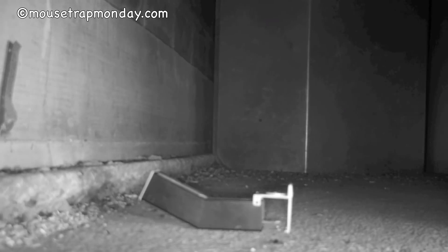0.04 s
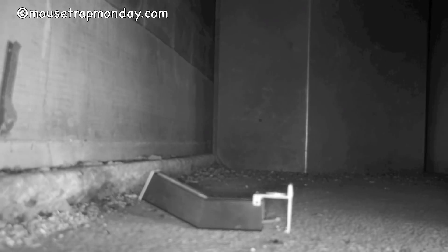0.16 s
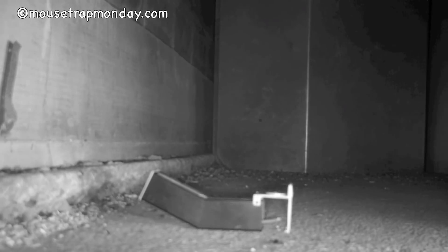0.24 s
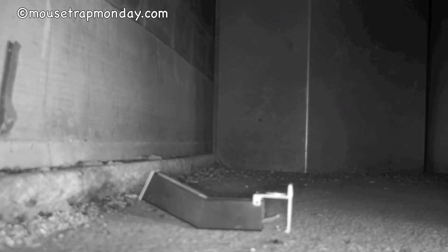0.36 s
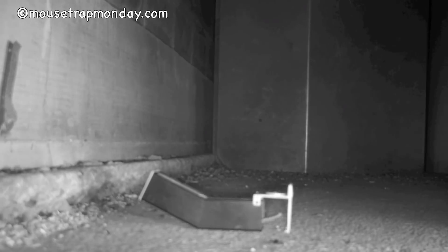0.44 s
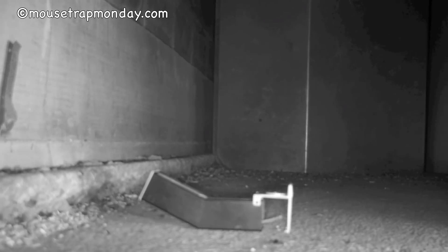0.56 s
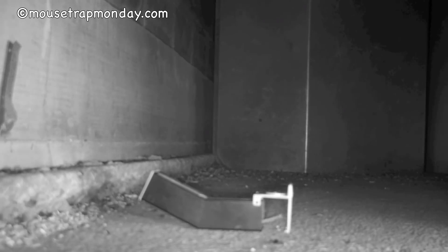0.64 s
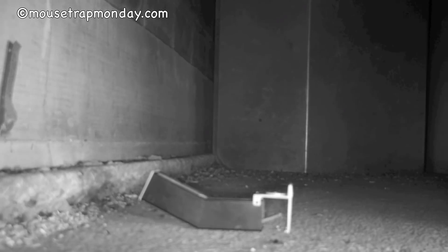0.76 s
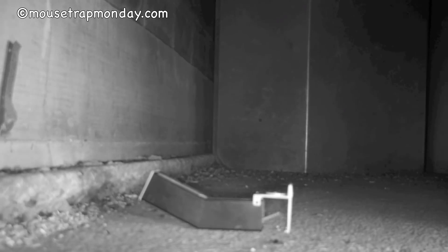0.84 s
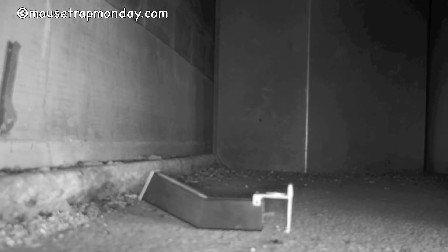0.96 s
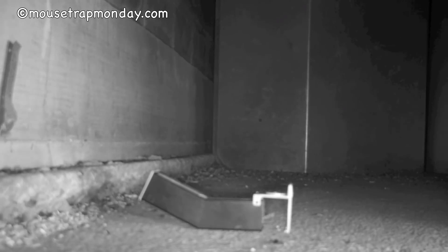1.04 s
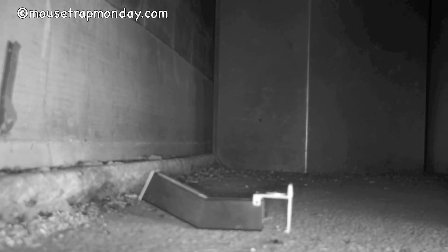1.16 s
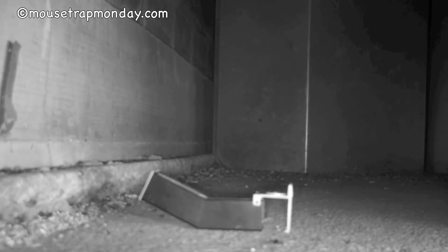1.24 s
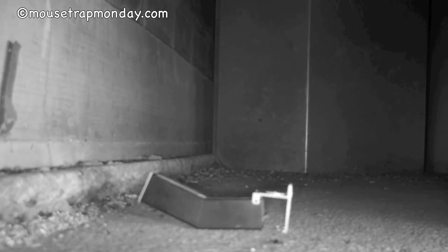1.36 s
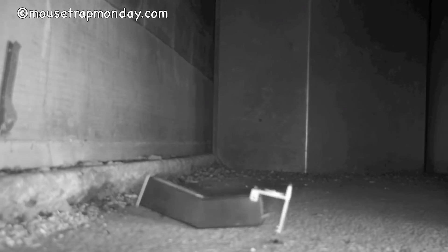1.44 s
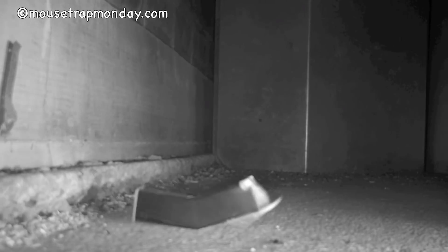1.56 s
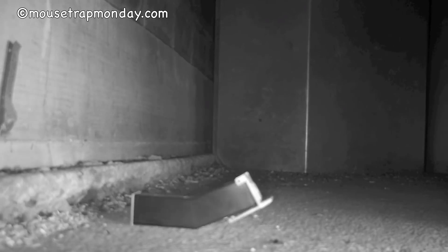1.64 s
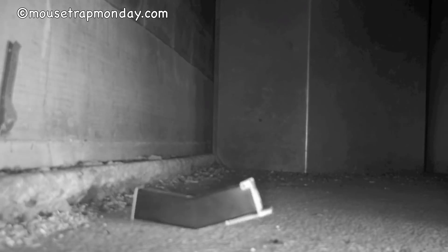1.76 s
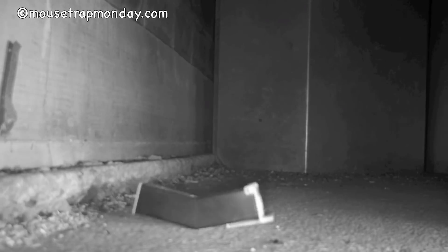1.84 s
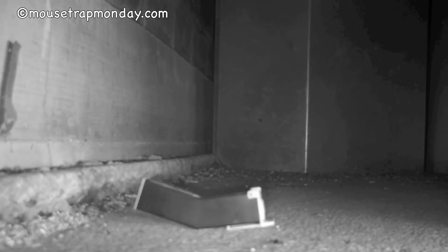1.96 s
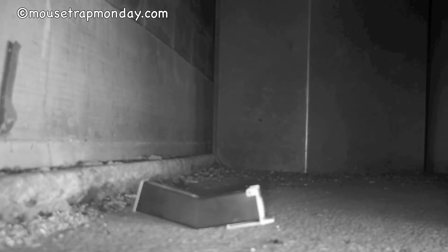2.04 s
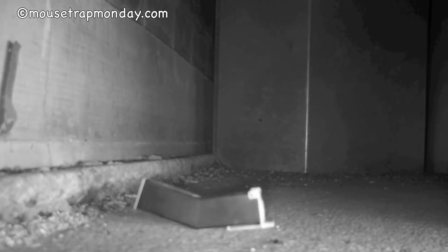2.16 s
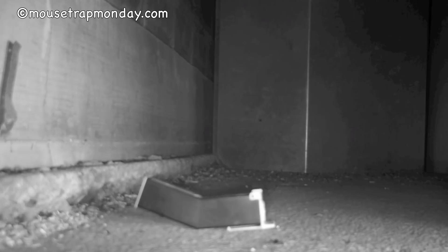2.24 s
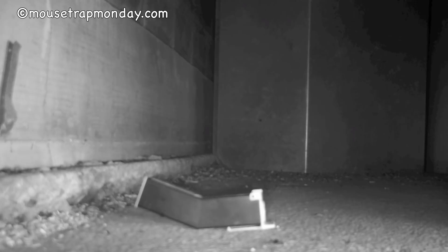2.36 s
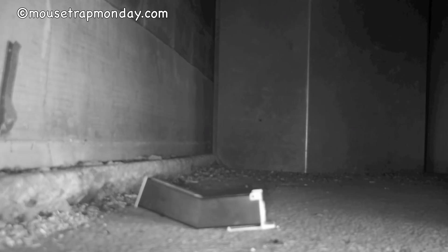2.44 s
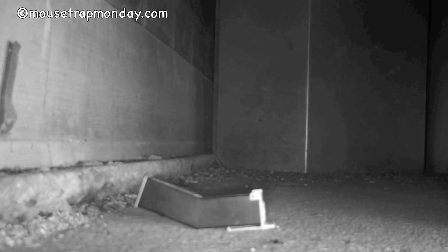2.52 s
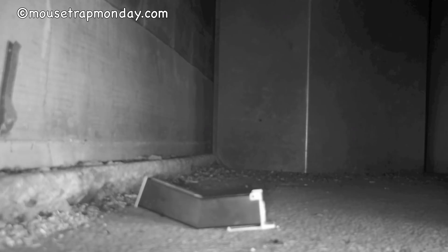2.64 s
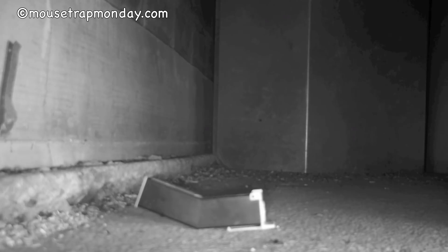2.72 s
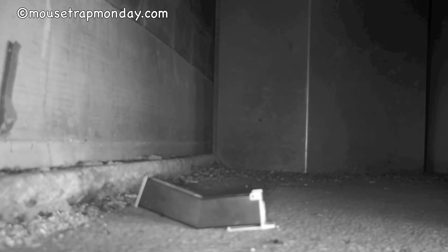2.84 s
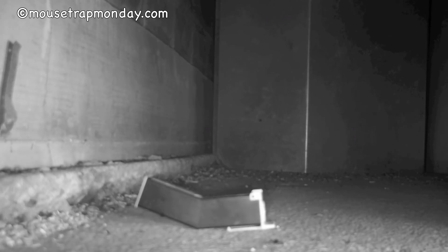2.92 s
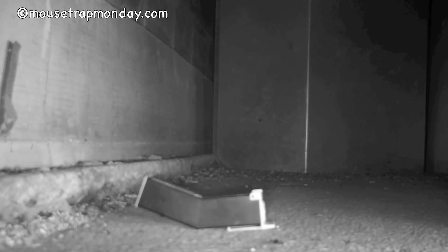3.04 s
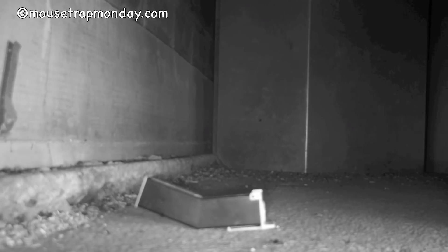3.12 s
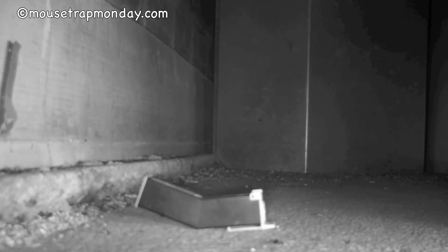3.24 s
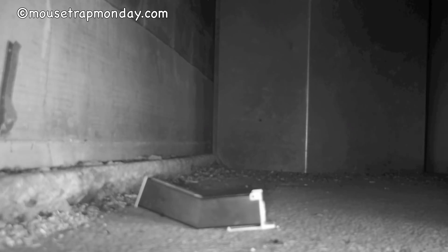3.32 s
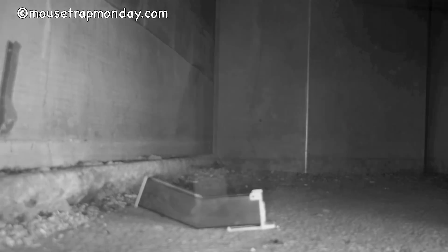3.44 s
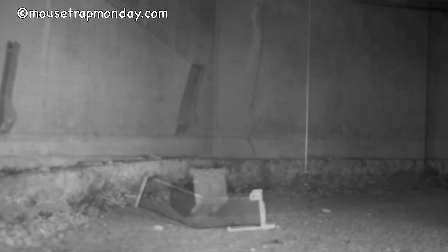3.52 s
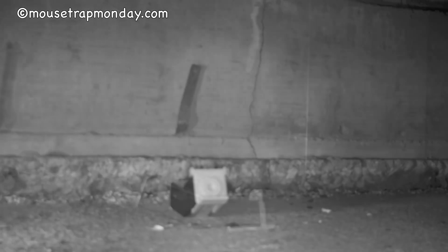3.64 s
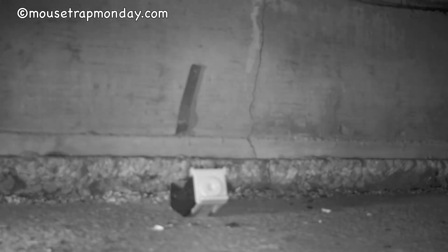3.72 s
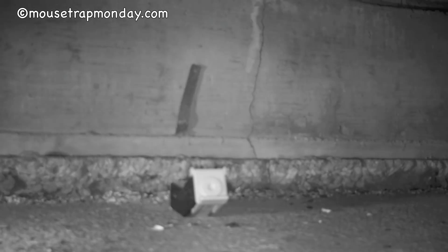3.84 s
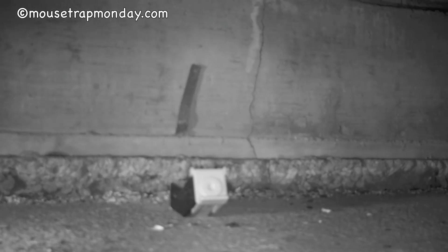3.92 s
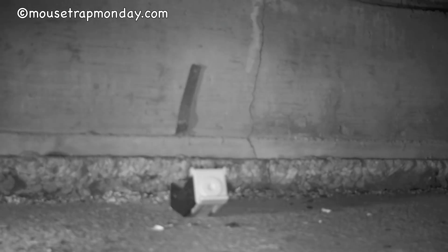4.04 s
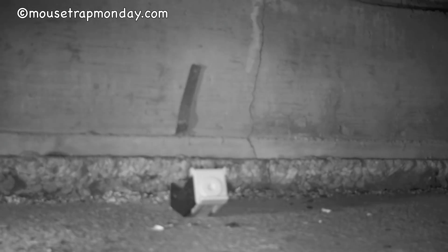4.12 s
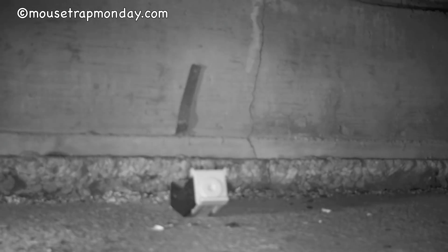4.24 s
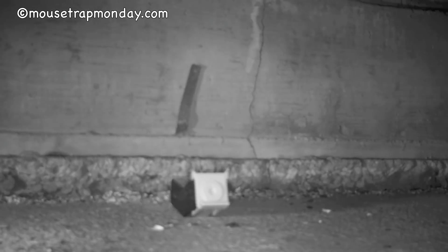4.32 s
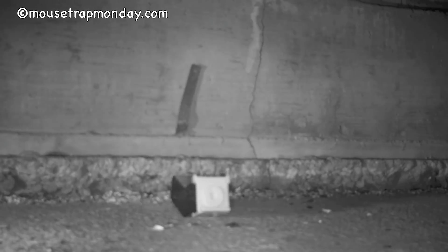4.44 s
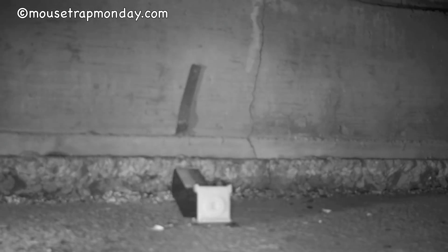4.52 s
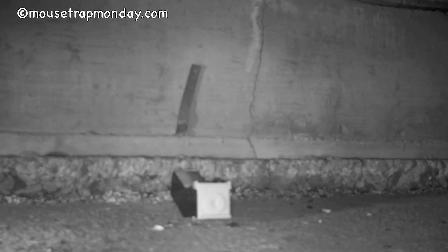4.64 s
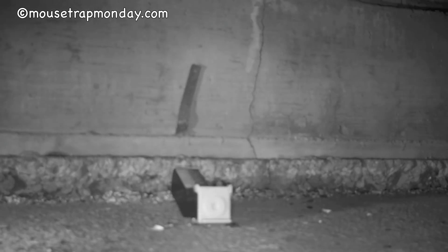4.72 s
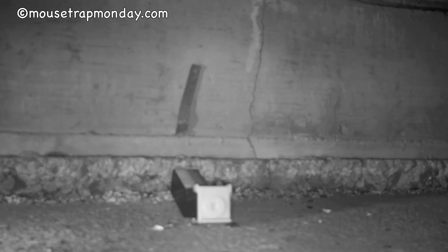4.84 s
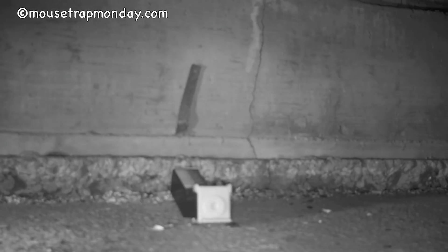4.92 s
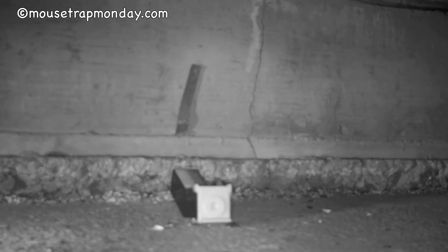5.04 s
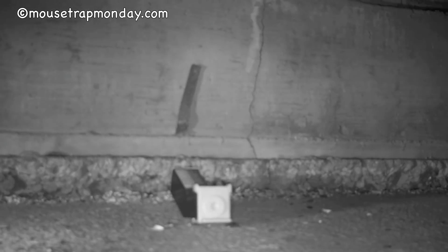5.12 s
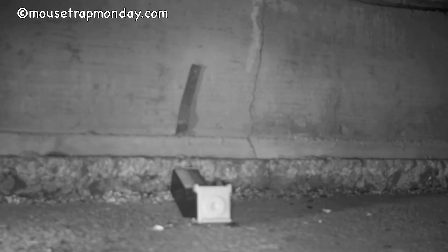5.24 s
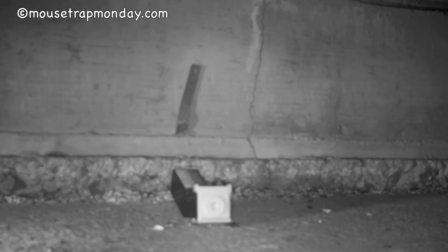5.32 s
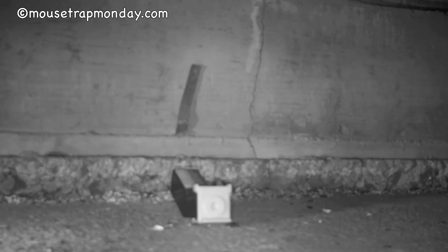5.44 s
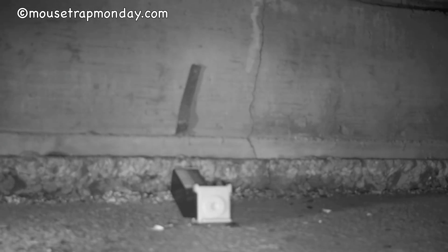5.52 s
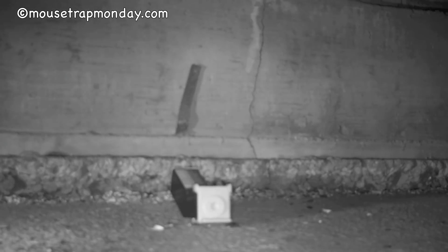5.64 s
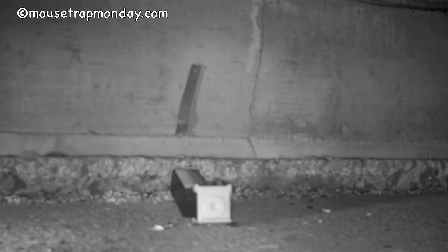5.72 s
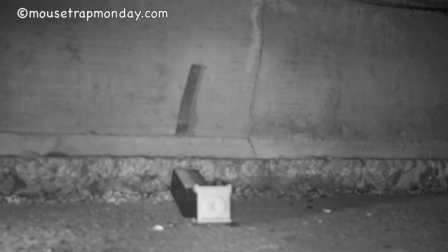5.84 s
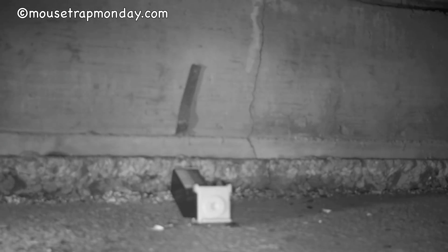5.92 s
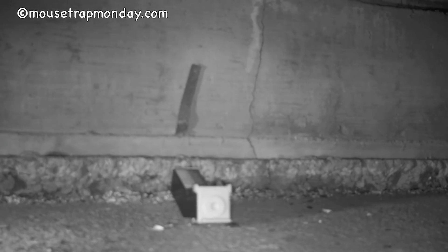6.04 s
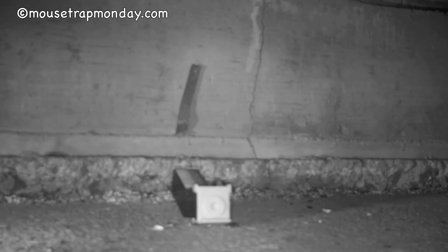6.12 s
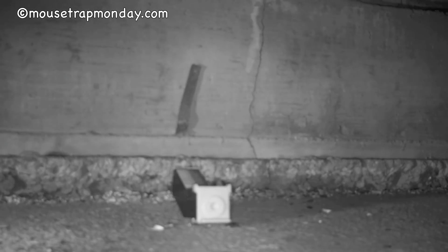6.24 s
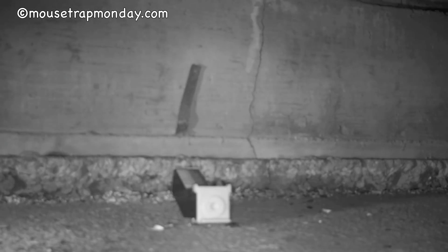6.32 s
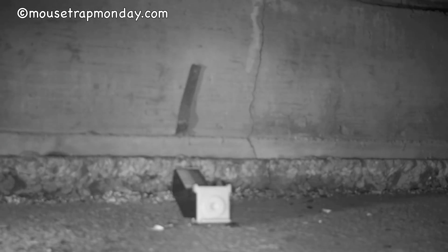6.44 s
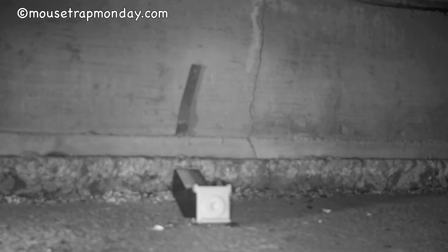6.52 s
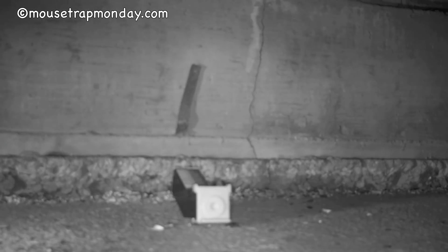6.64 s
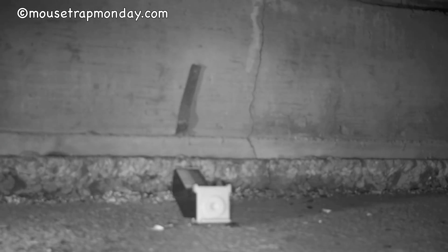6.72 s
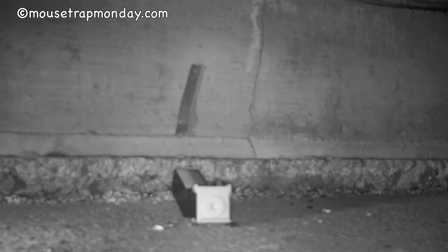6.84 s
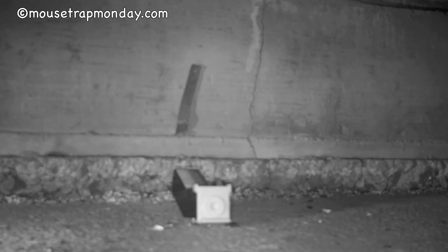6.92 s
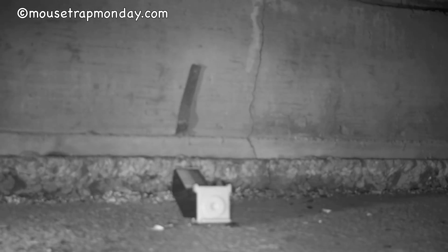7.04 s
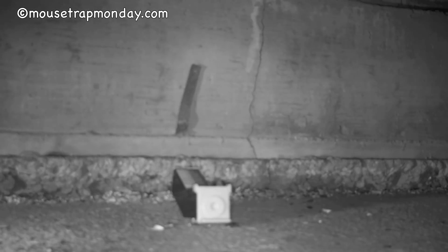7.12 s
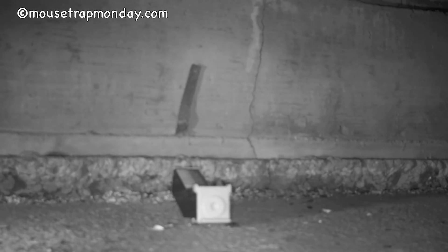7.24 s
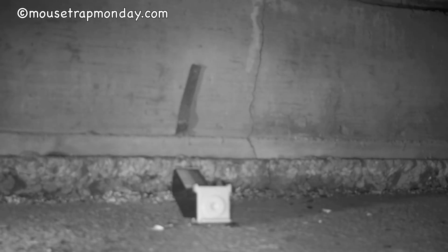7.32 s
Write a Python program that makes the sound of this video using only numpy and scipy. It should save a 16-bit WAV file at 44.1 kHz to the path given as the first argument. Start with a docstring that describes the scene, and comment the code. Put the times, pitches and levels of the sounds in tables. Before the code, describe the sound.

Over low hiss, a plastic mouse trap's door scrapes and snaps shut, followed by light knocks on concrete and faint scratches from inside.

```python
"""A quiet barn at night, one camera microphone close to a plastic see-saw trap on the concrete floor.
A mouse scratches its way in; from 1.4 s the trap tips and its door scrapes down, then snaps shut at
1.66 s, overloading the input. Until 2.3 s the body rocks back with tiny squeaks of the pivot. At 4.4 s
the trap drops back once more, and from 5.4 s claws tick inside it. The barn rings briefly after each
blow; night air, mains hum and the camera's hiss and thin whine lie under it all."""
import sys
import numpy as np
from scipy import signal
from scipy.fft import rfft, irfft, next_fast_len
from scipy.io import wavfile
from scipy.ndimage import uniform_filter1d

SR = 44100
rng = np.random.default_rng(int(sys.argv[2]) if len(sys.argv) > 2 else 0)


def log_audio(samples):
    """Write samples as a 16-bit WAV file to the path given in sys.argv[1]."""
    # one column per channel
    frames = np.atleast_2d(samples).T
    # limit to full scale, then quantise
    limited = np.clip(frames, -1, 1)
    pcm = np.round(limited * 32767).astype(np.int16)
    wavfile.write(sys.argv[1], SR, pcm)


N = 325017

# the door judders, snaps shut and rebounds, close to the microphone: (t/s, level/dB, weight/dB, edge/dB)
DOOR_KNOCKS = [(1.462, -48.5, 7, -6), (1.469, -36.5, -6, -11.5), (1.488, -33, -10, -7),
               (1.501, -29, -4, 4.5), (1.5238, -26.5, -9.5, 3.5), (1.552, -34, -1, -9),
               (1.5835, -29.5, 1.5, -2), (1.589, -34, 7.5, -10.5), (1.662, -12.5, 1, 12.5),
               (1.672, -21, 4, -7), (1.6925, -26.5, 10.5, 5), (1.702, -27, 4, 3), (1.7445, -32, -4, 14.5)]
# modes of the trap's body and door: (f/Hz, level/dB, t60/s)
BODY_MODES = [(158, -8, 0.078), (522, 0.5, 0.08), (623, -13, 0.13), (1055, -6, 0.047), (1165, -11.5, 0.072),
              (1377, -2.5, 0.09), (1840, -16.5, .1), (1918, -14, .09), (2171, 3, 0.053), (2507, 2.5, 0.07),
              (2680, -10, 0.072), (2794, -7.5, 0.07), (3017, -19, 0.0895), (3800, -11.5, 0.065),
              (4120, -14, 0.1005), (5030, -9, .05), (5470, -11.5, .05), (5660, -4, 0.03),
              (6460, -13, 0.036), (7100, -24, 0.08), (9040, -25.5, 0.054)]
def door(scuff_s=0.00018):
    """The swinging door strikes the open body."""
    return blows([(*row, scuff_s) for row in DOOR_KNOCKS], BODY_MODES,
                 thump_db=-23.5, knock_db=-10.5, ring_db=-7, crack_db=-20, modes_db=2.5,
                 dense_db=-11.5, dense_t60=0.064, contact_s=0.0052, grit_db=4.5, room_db=-10.5)


# the tube rocks and lands on the concrete: (t/s, level/dB, weight/dB, edge/dB, scuff/s)
TUBE_LANDINGS = [(1.971, -47, -1, -6, 0.00045), (1.978, -41.5, -2, -14, 0.0016),
                 (2.0095, -36, -2, 1.5, 0.00033), (2.264, -43, -7, -31, 0.0029),
                 (2.278, -51.5, 10, -2, 0.0029), (2.3005, -41.5, -1, 7, 0.00058),
                 (4.412, -31.5, -5.5, 3.5, 0.0023), (4.4528, -44.5, 4, 6, .0005),
                 (4.46, -48.5, 3.5, -7, .0018), (4.4785, -43.5, -9, 15.5, 0.0013),
                 (4.636, -42, 1.5, -7, 0.007), (4.683, -50, 7.5, -5, 0.0043)]
# modes of the tube while it presses on the floor: (f/Hz, level/dB, t60/s)
GROUNDED_MODES = [(363.4, -3, 0.14), (444, -9, 0.084), (524, -16, 0.042), (1038, -4, 0.08),
                  (1210, -5, 0.075), (1535, -3, 0.092), (1750, -3.5, 0.1), (2085, 3.5, 0.081),
                  (2580, -18, 0.026), (2740, 0, 0.06), (3590, 6.5, 0.026), (4330, 10, 0.011),
                  (5640, -10, .025)]
def tube():
    """The tube see-saws under the mouse and meets the floor."""
    return blows(TUBE_LANDINGS, GROUNDED_MODES,
                 thump_db=-9.5, knock_db=-1.5, ring_db=-7, crack_db=-17, modes_db=-1.5,
                 dense_db=-11, dense_t60=0.14, contact_s=0.0033, grit_db=1.0, room_db=-10.5)


# claws and teeth on the inner wall, heard from outside: (t/s, level/dB, weight/dB, edge/dB)
CLAW_TAPS = [(5.364, -55, 2, -3), (5.406, -38.5, -6, -1), (5.455, -51, 0, 6), (5.4843, -35.5, -9, -11),
             (5.564, -52, 0, 4), (6.041, -52, 2, 0), (6.164, -52.5, 5, 6), (6.17, -46.5, -3, 1),
             (6.9386, -44.5, -10, -13), (6.953, -56, 3, 13), (6.9978, -36, 2, 3), (7.3341, -49, 14, 11.5),
             (7.3454, -41, 7, -11)]
# modes of the closed tube's wall: (f/Hz, level/dB, t60/s)
WALL_MODES = [(1710, 0.5, 0.038), (2007, -7.5, 0.15), (2574, 4, 0.04), (2790, 10.5, 0.013),
              (3400, -3.5, 0.022), (3950, -11, 0.056), (5900, -24, .03), (6340, -5, 0.06)]
def claws(scuff_s=0.0016):
    """The mouse taps the wall of the closed tube."""
    return blows([(*row, scuff_s) for row in CLAW_TAPS], WALL_MODES,
                 thump_db=-29.5, knock_db=-13, ring_db=-11, crack_db=-18, modes_db=10.0,
                 dense_db=-9.5, dense_t60=0.17, contact_s=0.0044, grit_db=-1.5, room_db=-10.1)


# the door's pivot at its loudest moments: (t/s, f/Hz, level/dB, half length/s)
PIVOT_SQUEAKS = [(1.747, 5940, -30, 0.0031), (1.983, 6060, -35.5, 0.0037), (2.2765, 6040, -40.5, 0.0034),
                 (2.302, 6000, -28.5, 0.00089)]
def squeaks():
    """The pivot sticks and slips, singing for a few milliseconds as the trap rocks."""
    track = np.zeros(N)
    t = np.arange(-SR // 20, SR // 20) / SR
    for s, hz, db, half_s in PIVOT_SQUEAKS:
        phase = 2 * np.pi * hz * t + 0.06 * np.cumsum(rng.standard_normal(len(t)))
        add(track, s + t[0], amp(db) * np.exp(-(t / half_s) ** 2) * np.sin(phase))
    return track


# the door's legs creep, skid and fold over the floor: (t/s, level/dB, half length/s)
LEG_SKIDS = [(1.415, -59, 0.062), (1.512, -41.5, 0.038), (1.635, -46.5, 0.048)]
# spectrum of plastic on grit: (f/Hz, level/dB)
RASP_COLOUR = [(100, -30.5), (400, -21.5), (530, -3), (850, -20.5), (1380, 5), (1620, -20.5), (2050, 7.5),
               (2800, -1.5), (3200, -11), (4200, -29), (5500, -8), (7500, -29), (15000, -40)]
def drag(slips_per_s=1200, ring_db=0.5):
    """Grit catches the door's legs in tiny slips that ring the body."""
    t = np.arange(SR // 5) / SR
    slips = rng.standard_normal(N) * (rng.random(N) < slips_per_s / SR)
    ring = unit(signal.fftconvolve(slips, ringing(BODY_MODES, t))[:N])
    rasp = unit(coloured(slips, RASP_COLOUR))
    return strokes(LEG_SKIDS) * unit(amp(ring_db) * ring + rasp)


# soft claw strokes along the wall, faint even this close: (t/s, level/dB, half length/s)
CLAW_STROKES = [(1.067, -61, 0.0037), (2.153, -56, .013), (3.273, -54, 0.0025), (3.896, -65, 0.0043),
                (5.922, -58.5, 0.0077), (6.017, -64, 0.0077), (6.113, -64.5, .007), (6.89, -57, .003),
                (6.903, -51.5, .008), (7.317, -59, 0.011)]
# spectrum of a claw on plastic: (f/Hz, level/dB)
STROKE_COLOUR = [(100, -51), (1500, -22), (2100, -8), (2500, 1), (2800, 1), (3300, -32), (6000, -16),
                 (15000, -40)]
def scratches(slips_per_s=2500):
    """A sliding claw catches in many tiny slips that stir the wall near its main resonance."""
    slips = rng.standard_normal(N) * (rng.random(N) < slips_per_s / SR)
    return strokes(CLAW_STROKES) * unit(coloured(slips, STROKE_COLOUR))


def strokes(table):
    """Each rub swells and fades in a bell curve of pressure, loudest at its listed time."""
    t = np.arange(N) / SR
    return sum(amp(db) * np.exp(-((t - s) / half_s) ** 2) for s, db, half_s in table)


# spectrum of the plastic's many short-lived modes: (f/Hz, level/dB)
DENSE_COLOUR = [(70, -43), (140, -16), (280, -8), (500, 0.5), (850, -12.5), (1200, -5), (1600, -10.5),
                (2000, -3), (2750, -5), (3250, -14), (4300, -9), (6000, -2), (7500, -15), (12000, -20),
                (15500, -29)]
def blows(table, modes, thump_db, knock_db, ring_db, crack_db, modes_db,
          dense_db, dense_t60, contact_s, grit_db, room_db):
    """The surfaces scuff together, crack on contact, and leave clear modes over a wash of dense ones."""
    track = np.zeros(N)
    t = np.arange(-SR // 100, SR // 5) / SR
    for s, db, weight_db, edge_db, scuff_s in table:
        scuff = np.exp(-np.abs(t) / scuff_s)
        fade = np.exp(-np.abs(t) / contact_s) + amp(dense_db - 60 * np.abs(t) / dense_t60)
        grit = amp(grit_db * unit(uniform_filter1d(rng.standard_normal(len(t)), size=40)))
        dense = unit(coloured(rng.standard_normal(len(t)), DENSE_COLOUR))
        hit = dense * grit * np.where(t < 0, scuff, fade) + amp(modes_db) * ringing(modes, t)
        # around the clack at 0 dB, a heavy blow is deeper and one on a hard edge brighter
        balance_db = np.array([thump_db + weight_db, knock_db + weight_db, 0,
                               ring_db + 0.31 * edge_db, crack_db + edge_db])
        add(track, s + t[0], in_barn(balanced(hit, db + balance_db), room_db))
    return track


def ringing(modes, t):
    """The clear modes after a blow at t = 0; the loose parts rattle, which roughens their pitch."""
    hz, db, t60 = np.transpose(modes)[:, :, None]
    after = np.maximum(t, 0)
    sizes = amp(db + rng.uniform(-2, 2, hz.shape)) * rng.choice([-1, 1], hz.shape)
    jolts = rng.standard_normal((len(hz), len(t))) * (t > 0)
    rattle = 0.02 * np.sqrt(hz / 1000) * np.cumsum(jolts, 1)
    partials = sizes * amp(-60 * after / t60) * np.sin(2 * np.pi * hz * after + rattle)
    return np.sum(partials, 0) / np.linalg.norm(sizes)


# a blow's thump, knock, clack, ring and crack: (low f/Hz, high f/Hz)
BLOW_BANDS = [(130, 430), (430, 1600), (1600, 3500), (3500, 8000), (8000, 15000)]
def balanced(hit, bands_db):
    """Colour a blow so that the loudest 4 ms of each band come near its given level."""
    parts = [signal.sosfilt(signal.butter(2, band, "band", fs=SR, output="sos"), hit)
             for band in BLOW_BANDS]
    peak_powers = [uniform_filter1d(part ** 2, size=176).max() for part in parts]
    gains_db = bands_db - 10 * np.log10(peak_powers)
    centres_hz = np.sqrt(np.prod(BLOW_BANDS, 1))
    bass = [(70, gains_db[0] - 18), (150, gains_db[0])]  # the blows fall away steeply below 150 Hz
    return coloured(hit, [*bass, *zip(centres_hz, gains_db)])


# how long the barn rings around the trap: (f/Hz, t60/s)
BARN_DECAY = [(150, 0.56), (500, 0.95), (1500, 0.71), (3000, 0.79), (6000, 0.56), (10000, 0.38),
              (15000, 0.15)]
# spectrum of that ring at the microphone: (f/Hz, level/dB)
BARN_COLOUR = [(80, -53), (200, 4), (500, 1.5), (1000, 0), (1800, -2), (2300, -9), (3200, -2), (6000, -5),
               (10000, 3), (15000, -4.5)]
def in_barn(x, room_db):
    """The direct sound and the barn's answer, different from every spot; the treble dies first."""
    hz, t, noise = signal.stft(rng.standard_normal(SR * 3 // 4), SR, nperseg=256)
    decay = amp(-60 * t / along(BARN_DECAY, hz)[:, None])
    build_up = 1 - np.exp(-t / 0.0059)
    tail = signal.istft(noise * decay * build_up, SR, nperseg=256)[1]
    room = amp(room_db) * coloured(tail / np.linalg.norm(tail), BARN_COLOUR)
    room[0] += 1  # the direct path to the microphone
    return signal.fftconvolve(x, room)


# barn air with hiss, the microphone in a corner and by a wall: (f/Hz, level/dB)
AIR_CORNER = [(12, -38.5), (20, -3), (70, -3.5), (140, -10.5), (213, -12.5), (252, -17), (298, -17),
              (465, -19), (505, -20), (686, -20.5), (2760, -33), (7520, -37), (8170, -37), (8880, -37.5),
              (15500, -39)]
AIR_WALL = [(12, -39), (20, -1), (70, 1), (109, -6.5), (137, -1), (161, -8.5), (245, -7), (427, -13),
            (667, -13.5), (2150, -24), (7110, -31.5), (8170, -31), (8880, -32.5), (11700, -32),
            (15500, -34.5)]
# three stretches of background, in turn: (level/dB, hiss lift/dB)
STRETCH_LEVELS = [(-58, 3.5), (-56, 1), (-57.5, 2.5)]
# crossfades from one stretch to the next: (middle t/s, length/s)
CROSSFADES = [(3.62, 0.52), (6.244, 0.41)]
def background(whine_hz=7867.5, whine_db=-73, hum_hz=60, hum_db=-66):
    """Over steady mains hum, night air, hiss and whine dip at two crossfades between three stretches."""
    t = np.arange(N) / SR
    first, second = [np.clip((t - s) / length_s + 0.5, 0, 1) for s, length_s in CROSSFADES]
    shares = np.array([1 - first, first - second, second])
    spectra = (AIR_CORNER, AIR_WALL, AIR_WALL)
    night = np.zeros(N)
    for share, spectrum, (air_db, hiss_db) in zip(shares, spectra, STRETCH_LEVELS):
        air = unit(filtered(rng.standard_normal(N), lambda hz: amp(along(spectrum, hz))))
        hiss = filtered(air, lambda hz: hz ** 2 / (hz ** 2 + 2000 ** 2))
        night += share * amp(air_db) * (air + (amp(hiss_db) - 1) * hiss)
    dips = np.linalg.norm(shares, axis=0)
    whine = dips * np.sqrt(2) * np.sin(2 * np.pi * whine_hz * t)
    hum = np.sin(2 * np.pi * hum_hz * t)
    return night + amp(whine_db) * whine + amp(hum_db) * hum


def amp(db):
    """Decibels to gain."""
    return 10 ** (np.asarray(db) / 20)


def unit(x):
    """Scale to rms 1."""
    return x / np.sqrt(np.mean(x ** 2) + 1e-20)


def along(points, hz):
    """(f/Hz, value) points read on a log axis."""
    f, v = np.transpose(points)
    return np.interp(np.log(hz + 1), np.log(f + 1), v)


def filtered(x, response):
    """Shape the spectrum of x by a gain that depends on frequency."""
    size = next_fast_len(len(x) + 8192, True)
    return irfft(rfft(x, size) * response(np.fft.rfftfreq(size, 1 / SR)), size)[:len(x)]


def coloured(x, points, size=2048):
    """Causal filter through (f/Hz, level/dB) points: it rings only after a blow."""
    gain = amp(along(points, np.fft.rfftfreq(size, 1 / SR)))
    cepstrum = irfft(np.log(gain))
    cepstrum[1:size // 2] *= 2
    cepstrum[size // 2 + 1:] = 0
    return signal.fftconvolve(x, irfft(np.exp(rfft(cepstrum))))[:len(x)]


def add(track, s, sound):
    """Mix a sound in at time s."""
    part = track[round(s * SR):][:len(sound)]
    part += sound[:len(part)]


def scene():
    """Trap and mouse close by, the barn behind them, in mono at the microphone."""
    rubbing = in_barn(drag() + scratches(), room_db=-6.5)[:N]
    pivot = in_barn(squeaks(), room_db=-20.0)[:N]
    return (door() + tube() + claws() + rubbing + pivot + background())[None]


def record(dry):
    """The microphone input overloads softly on the snap, and the highest treble is cut off."""
    ceiling_db, top_hz = -14.3, 15500
    clipped = dry[0] / (1 + np.abs(dry[0] / amp(ceiling_db)) ** 6) ** (1 / 6)
    return filtered(clipped, lambda hz: 1 / (1 + (hz / top_hz) ** 120))[None]


dry = scene()
out = record(dry)
log_audio(out)
```